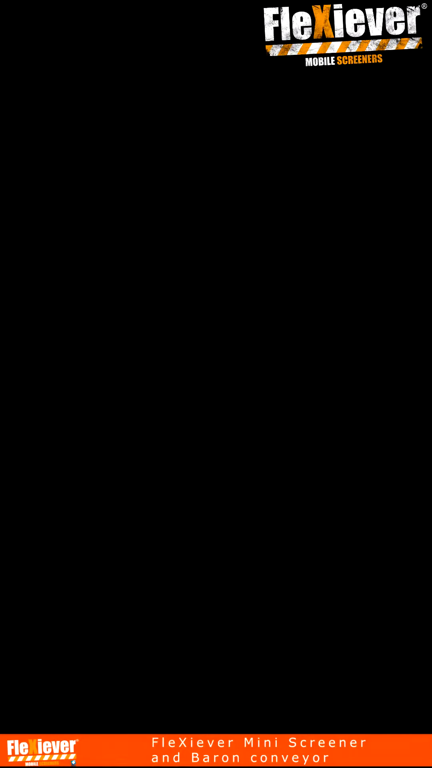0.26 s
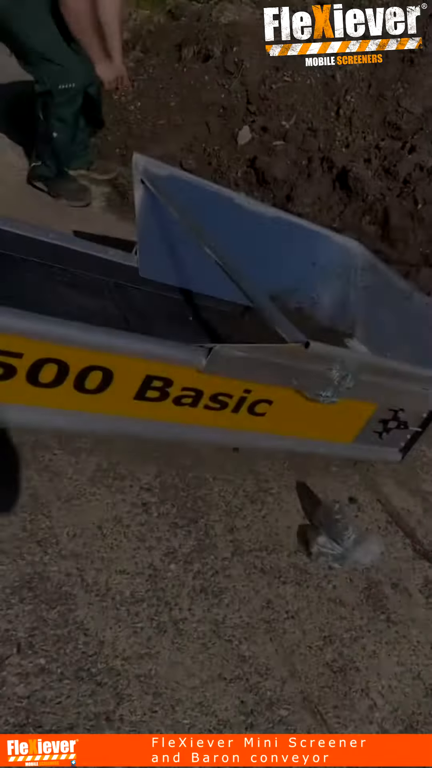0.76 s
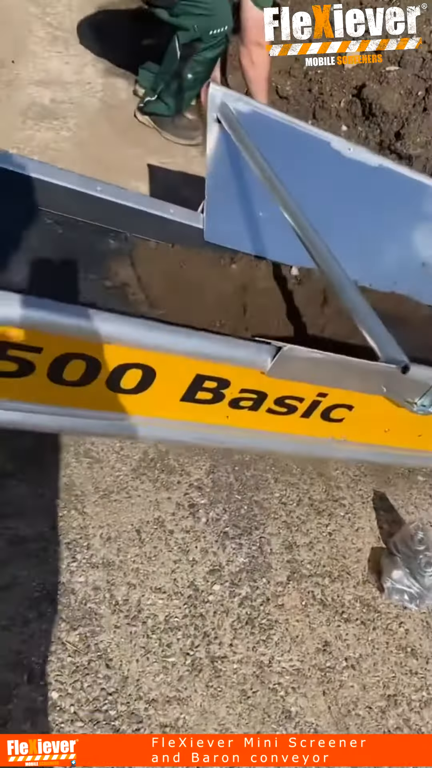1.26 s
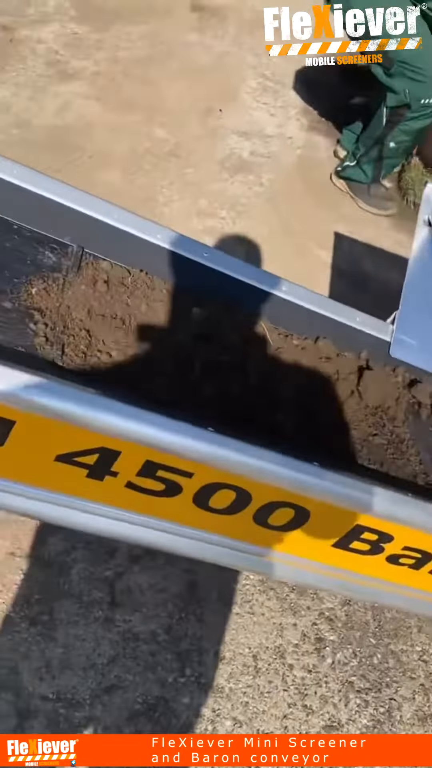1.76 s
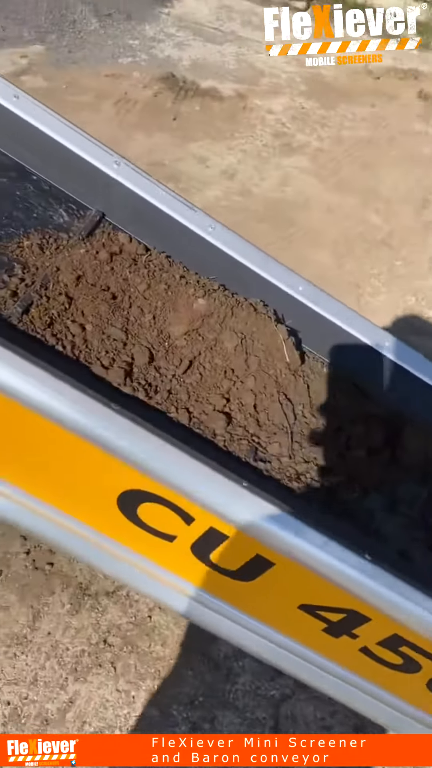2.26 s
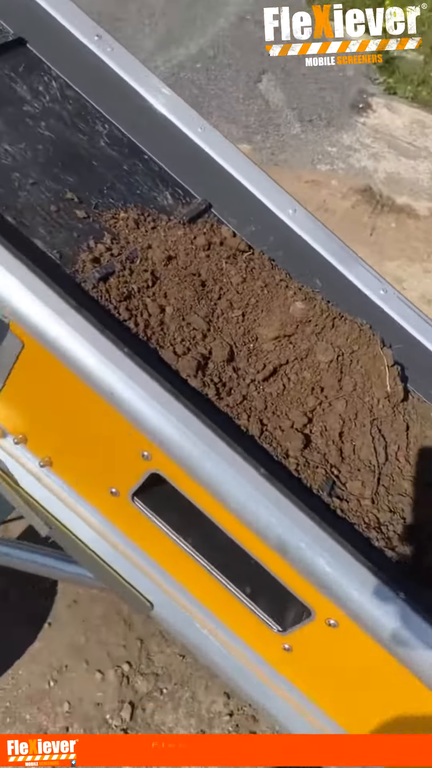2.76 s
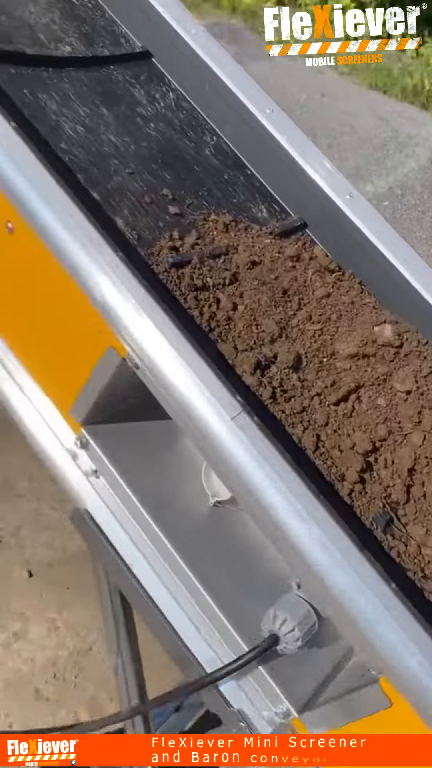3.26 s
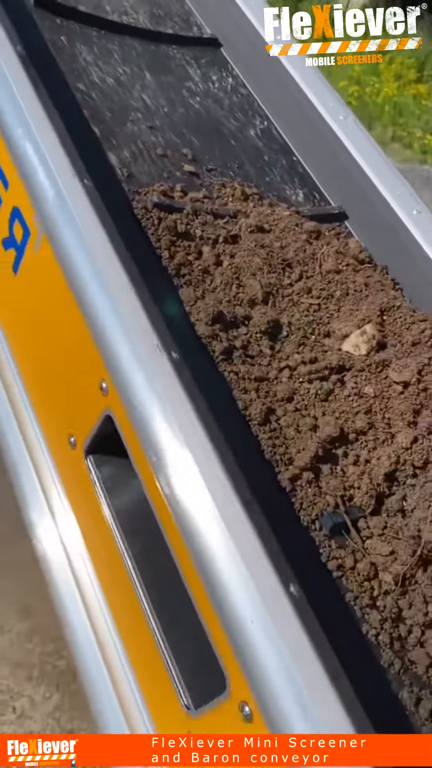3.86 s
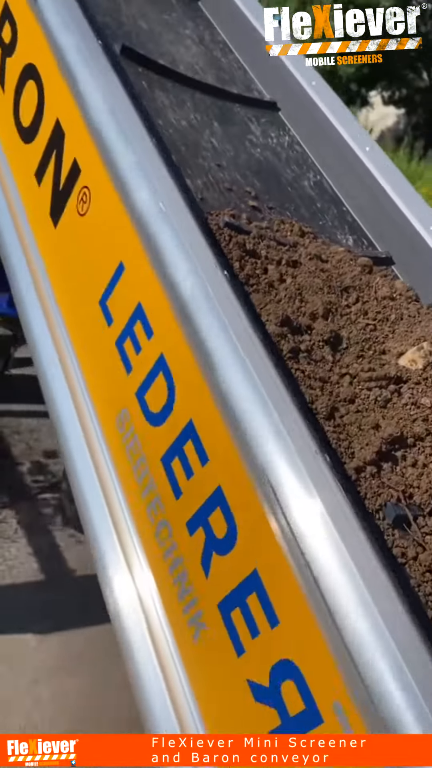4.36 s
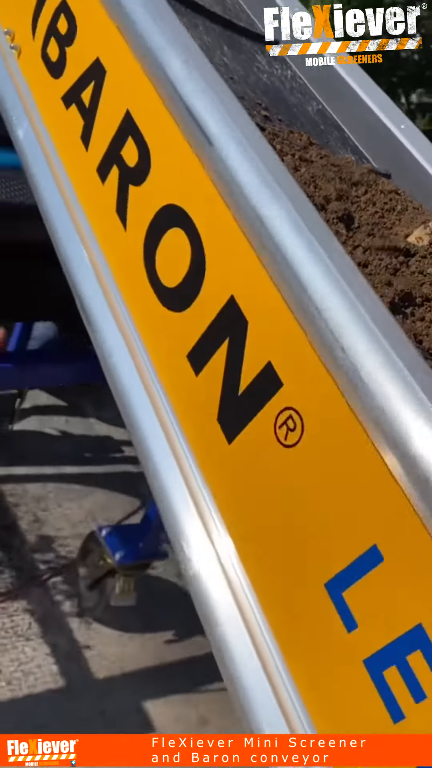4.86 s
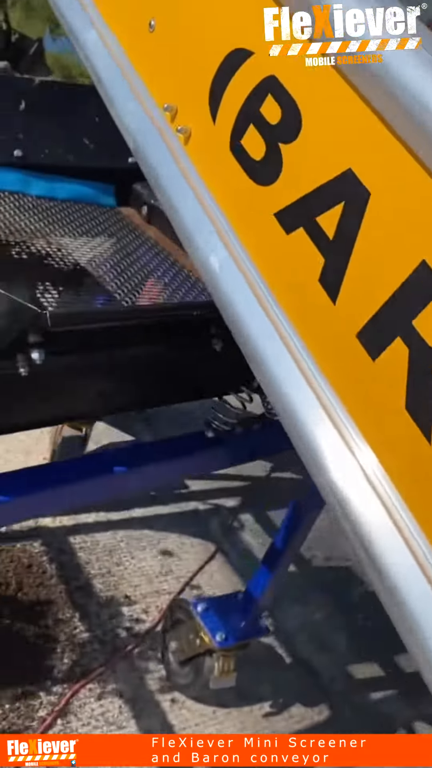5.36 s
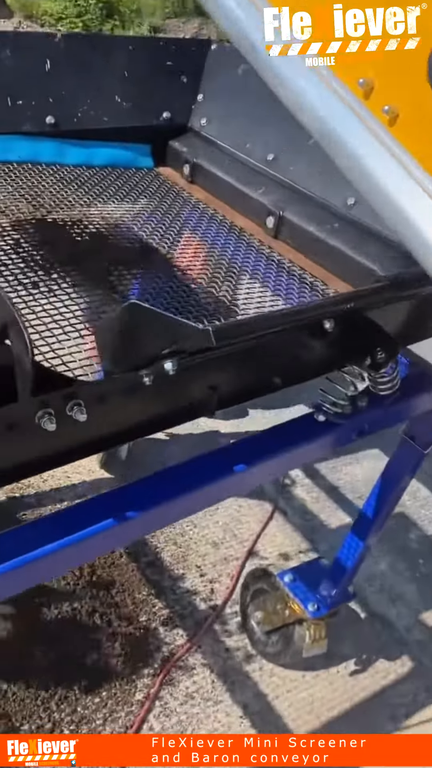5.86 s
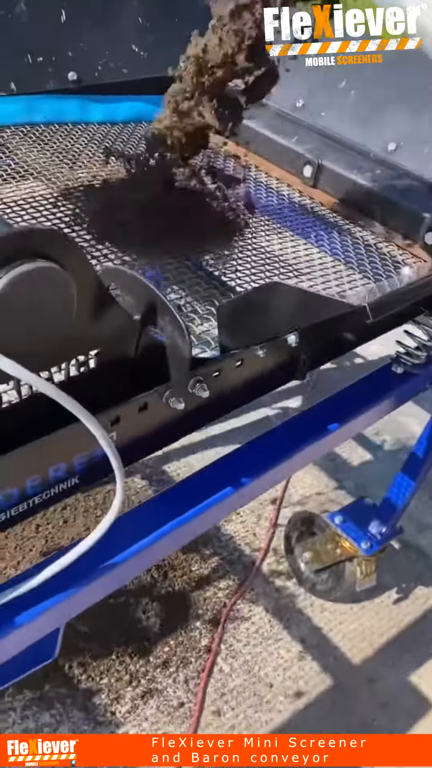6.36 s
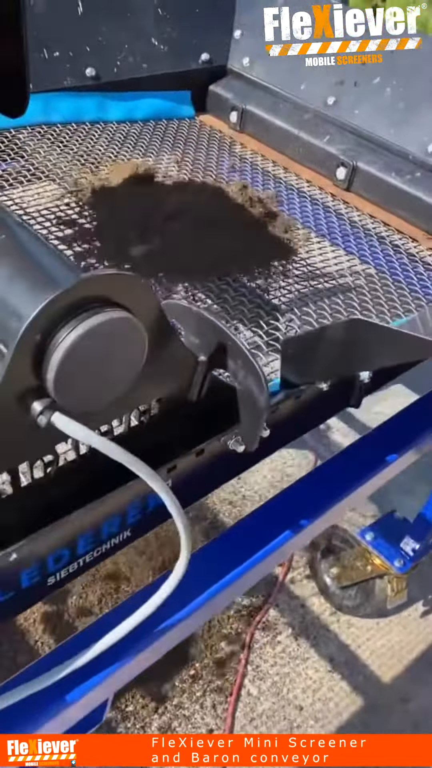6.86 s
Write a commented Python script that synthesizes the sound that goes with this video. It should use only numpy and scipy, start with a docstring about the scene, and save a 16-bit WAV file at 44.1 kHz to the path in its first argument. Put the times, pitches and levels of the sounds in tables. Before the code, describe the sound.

Steady machine rumble and fast metal mesh chatter outdoors, with dull soil thuds, shovel clangs and later lumps knocking on ringing plates.

```python
"""Outdoors at a vibrating soil screener, heard from a phone carried along the feed belt to the deck.
Belt and rollers rumble; belt, frame and legs ring with the shaking. The loose mesh chatters and slaps
once a shaft turn. Shovelled soil thuds into the hopper and the shovel clangs on its sheet; later,
clods knock on the deck and ring its side plates. The sound fades in."""
import sys
import numpy as np
from scipy import signal
from scipy.fft import rfft, irfft, next_fast_len
from scipy.io import wavfile
from scipy.ndimage import uniform_filter1d

SR = 44100
rng = np.random.default_rng(int(sys.argv[2]) if len(sys.argv) > 2 else 0)


def generate_wav(signal):
    """Clip the signal to [-1, 1] and save it as 16-bit WAV at the path in sys.argv[1]."""
    frames = np.transpose(np.atleast_2d(signal))
    scaled = np.clip(frames, -1, 1) * 32767
    pcm = np.round(scaled).astype(np.int16)
    wavfile.write(sys.argv[1], SR, pcm)


N = 313992
N_FFT = next_fast_len(N)
TIME_S = np.arange(N) / SR
BINS_HZ = np.arange(N_FFT // 2 + 1) * SR / N_FFT + 1
SHAFT_HZ = 24.265


def undb(db):
    return 10 ** (np.asarray(db) / 20)


def unit_rms(x):
    return x / np.sqrt(np.mean(x ** 2))


def over_time(table):
    return np.interp(TIME_S, *np.transpose(table))


def over_hz(table):
    """A (Hz, value) table at every bin, interpolated on a log axis."""
    hz, value = np.transpose(table)
    return np.interp(np.log(BINS_HZ), np.log(hz), value)


def to_samples(spectrum):
    return irfft(spectrum, N_FFT)[:, :N]


def band(x, lo_hz, hi_hz):
    return signal.sosfilt(signal.butter(3, [lo_hz, hi_hz], "band", fs=SR, output="sos"), x)


def mode(x, hz, t60_s):
    pole = np.exp(2j * np.pi * hz / SR - np.log(1000) / (t60_s * SR))
    return signal.lfilter([1], [1, -pole], x).imag


def resonance(x, hz, width_hz):
    return signal.lfilter(*signal.iirpeak(hz, hz / width_hz, fs=SR), x)


def drift(rate_hz):
    """Random steps, smoothed twice; spread near 1."""
    hold = int(SR / rate_hz)
    steps = np.repeat(rng.standard_normal(N // hold + 1), hold)
    return uniform_filter1d(uniform_filter1d(steps, hold), hold)[:N]


def burst(start_s, rise_s, t60_s, curve=1.467):
    """Slice and envelope of a blow: short rise, then a fall that steepens as the bouncing dies."""
    start = int(start_s * SR)
    t = np.arange(min(int(t60_s * SR), N - start)) / SR
    attack = np.sin(np.pi / 2 * np.minimum(t / rise_s, 1)) ** 2
    return slice(start, start + len(t)), attack * undb(-60 * (t / t60_s) ** curve)


def hum(modes):
    """Noise-driven rings with steep flanks."""
    out = np.zeros((2, N))
    for hz, width_hz, db in modes:
        ring = resonance(rng.standard_normal((2, N)), hz, width_hz)
        out += undb(db) * unit_rms(resonance(ring, hz, 2 * width_hz))
    return out


def rumble(upper_db):
    """Belt, rollers and frame: half-octave noise bands, each flickering on its own."""
    # rumble spectrum: (frequency [Hz], relative density [dB])
    density = [(15, -54), (25, -21), (55, -10), (80, -11.5), (113, -5.5), (176, -8.5), (232, -8.5),
               (287, -12), (468, -7.5), (716, -11.5), (1170, -13), (1670, -20), (1860, -21), (3040, -25),
               (4000, -31.5), (5200, -69), (8800, -120)]
    # bands below about 200 Hz: (time [s], level [dB])
    bass_level = [(.31, -38), (.85, -31.5), (1.2, -38), (2.4, -36.5), (3.0, -36), (4.7, -36.5), (5.3, -44),
                  (6.3, -35.5), (7.12, -41)]
    spectrum = rfft(rng.standard_normal((2, N_FFT))) * undb(over_hz(density))
    bass, upper = np.zeros((2, 2, N))
    for log2_hz in np.arange(4.5, 12.6, .5):
        window = np.clip(1 - abs(np.log2(BINS_HZ) - log2_hz) * 2, 0, 1)
        part = undb(3 * drift(14)) * to_samples(spectrum * window)
        if 2 ** log2_hz < 200:
            bass += part
        else:
            upper += part
    return unit_rms(upper) * undb(upper_db) + unit_rms(bass) * undb(over_time(bass_level))


def belt_and_frame(belt_db, frame_db):
    """Rings kept going by the shaking; the frame's wavers."""
    # belt modes: (frequency [Hz], width [Hz], level [dB])
    belt_modes = [(471.7, 16.6, -3.5), (453, 250, -3)]
    # frame modes: (frequency [Hz], width [Hz], level [dB])
    frame_modes = [(223, 33, 1), (392, 81, -5), (546, 63, -12)]
    return hum(belt_modes) * undb(belt_db) + hum(frame_modes) * undb(frame_db + 1.9 * drift(20))


def legs():
    """The legs ring in one narrow low mode."""
    # leg ring: (time [s], level [dB])
    level = [(.31, -46), (4.2, -46.5), (4.9, -38), (5.3, -40), (5.9, -38), (6.25, -33.5), (7.12, -37)]
    hz, width_hz = 160.5, 11
    return hum([(hz, width_hz, 0)]) * undb(over_time(level))


def shaft():
    """Low multiples of the shaft rate, drifting in level and phase."""
    # shaft tones: (multiple of the shaft rate, level [dB])
    tones = [(3, -50.5), (4, -44.5), (5, -42.5)]
    turns = SHAFT_HZ * TIME_S
    return sum(undb(db + 4.6 * drift(2.5)) * np.sin(2 * np.pi * (multiple * turns + 0.12 * drift(2.98)))
               for multiple, db in tones)


def wire_chatter():
    """Dense knocks, a few much harder, ring in the loose wires; returns low, mid and top bands."""
    # mesh spectrum: (frequency [Hz], relative density [dB])
    density = [(240, -4), (400, -15.5), (1000, -5.5), (1700, -4), (2700, -7.5), (3500, -6.5), (5600, -11),
               (6500, -14.5), (8000, -27.5), (10000, -28.5), (13000, -29), (13500, -81), (15700, -58)]
    # wire resonances: (frequency [Hz], width [Hz], relative level [dB])
    wires = [(780, 20, 0.5), (894, 35, 0), (1150, 35, -9), (1886, 154, -5.5), (2614, 21, -6),
             (4110, 150, -16), (4820, 75, -21), (5850, 150, -15), (8620, 940, -5)]
    knocks = rng.standard_normal((2, N)) * undb(1.93 * np.minimum(rng.exponential(size=N), 7.5))
    chatter = to_samples(rfft(knocks, N_FFT) * undb(over_hz(density)))
    chatter += sum(undb(db + 5.5) * resonance(chatter, hz, width_hz) for hz, width_hz, db in wires)
    bands_hz = (300, 1460), (2300, 5410), (6300, 12500)
    return [unit_rms(band(chatter, *edges)) for edges in bands_hz]


def wire_patch(x, spread_db, width_hz=45):
    """Random spectral peaks and dips: every blow shakes another patch of wires."""
    size = 8192
    bins, width = size // 2 + 1, int(width_hz * size / SR) + 1
    peaks = uniform_filter1d(np.repeat(rng.standard_normal(bins), width)[:bins], width)
    return unit_rms(irfft(rfft(x, size) * undb(spread_db * peaks), size)[:, :x.shape[1]])


def mesh_rattle(low, mid, top):
    """The loose mesh chatters all the time and slaps once a shaft turn."""
    # top band against mid band: (time [s], level [dB])
    top_level = [(.31, -7), (.9, -4), (1.2, -7), (2.0, -5.5), (2.6, -7.5), (3.4, -3.5), (4.1, -2.5),
                 (4.7, -7.5), (5.5, -6.5), (6.2, -6.5), (7.12, -6.5)]
    chatter = (undb(-1.5 + 0.5 * drift(19)) * low
               + undb(0.49 * drift(14)) * mid
               + undb(over_time(top_level) + 3.4 * drift(22)) * top)
    out = undb(-10) * chatter
    for turn_s in np.arange(0.017, N / SR - .01, 1 / SHAFT_HZ):
        late_s = 0.0038 * abs(rng.standard_normal())
        at, envelope = burst(turn_s + late_s, rise_s=0.0088, t60_s=0.17)
        slap_db = 2.5 + 3 * rng.standard_normal()
        out[:, at] += undb(slap_db) * envelope * wire_patch(chatter[:, at], spread_db=5.7)
    return out


def hard_slaps(low, mid, top):
    """Hard slaps of the mesh, each with one strongest wire; a stone ticks on a wire near the peak."""
    # slaps: (time [s], level [dB], low band [dB], top band [dB], wire [Hz], t60 before limiting [s])
    slaps = [(.524, -35.5, 9, 6, 4080, 0.077), (.792, -15.5, -2.5, -30, 2900, 0.021),
             (.975, -43, -11, -19, 4470, 0.034), (1.015, -48, -11, -24, 4600, 0.061),
             (1.06, -32.5, -1, -36, 2460, 0.078), (1.138, -36, 1, -5, 2960, 0.12),
             (1.172, -35.5, 5, -9, 4090, 0.13), (1.262, -26.5, -7, -11, 4320, .075),
             (1.346, -33, 0, -4, 3900, 0.095), (1.387, -38, -5, -17, 4300, 0.048),
             (1.51, -41, 3, -18, 3000, 0.11), (1.55, -39, -1, -20, 3300, 0.047),
             (1.634, -29, 4, -34, 3600, 0.081), (1.714, -40.5, -7, -7, 3430, 0.18),
             (1.963, -36, -5, -21, 3400, 0.21), (2.037, -37.5, 17.5, -5, 2680, 0.15),
             (2.119, -36, -6, 0, 2790, 0.074), (2.21, -41, 21.5, -29, 2580, 0.14),
             (2.332, -28, 11, -35, 2700, 0.16), (2.458, -26, -5, -40, 2600, 0.087),
             (2.495, -25, 5.5, -12, 2370, 0.13), (2.615, -41, 9, -1, 3560, 0.062),
             (2.959, -31, -8, 8.5, 2750, 0.11), (3.057, -41.5, 2, 9, 5640, 0.12),
             (3.42, -30.5, 9, 8, 3870, 0.064), (3.459, -31, -10, -5, 5500, 0.073),
             (3.502, -25, -18, -6, 2670, 0.035), (3.584, -28, 4, 2, 5260, 0.079),
             (3.704, -30.5, 12, -14, 2460, 0.021), (3.777, -34, -18, -15, 2850, 0.045),
             (3.863, -33, 6, -2, 3550, 0.25), (3.992, -27.5, -2, 3.5, 3200, 0.12),
             (4.094, -25.5, -7, 1.5, 5600, 0.046), (4.18, -31.5, -2, -21, 2470, 0.071),
             (4.268, -35, -9, -12, 2840, 0.04), (4.398, -26.5, 1, -18, 2460, 0.19),
             (4.555, -25.5, -31, 1, 2330, 0.067), (4.638, -18, -12, -5, 4950, 0.1),
             (4.67, -24.5, 6.5, -7, 4140, 0.085), (4.76, -17.5, -7, -30, 4020, 0.064),
             (4.834, -29, -12, 4, 5600, 0.033), (4.889, -27, 3, -18, 2220, 0.12),
             (4.92, -40, -5, 11, 4500, 0.044), (4.962, -29, -7, -2, 2300, 0.087),
             (5.002, -16.5, -1.5, -2, 2050, 0.078), (5.09, -26.5, -7, -19, 3000, 0.035),
             (5.13, -26.5, -13, -10, 4280, 0.035), (5.173, -31.5, 14, -18, 4400, 0.021),
             (5.209, -23.5, 0, -7, 4000, 0.035), (5.258, -26, -6, -28, 2730, 0.053),
             (5.292, -29, -1, 3.5, 2640, 0.056), (5.331, -21.5, 2, -12, 2670, 0.065),
             (5.421, -24, -8, -16, 2620, 0.085), (5.463, -19, -5, 4, 5200, 0.15),
             (5.504, -17.5, -7, -3, 5040, 0.081), (5.549, -23, -15, 5.5, 5300, 0.073),
             (5.619, -22.5, -23, -0.5, 5000, 0.11), (5.665, -19.5, -6, -1.5, 5000, 0.031),
             (5.7, -37, 4, 1, 2700, 0.21), (5.796, -30, 7, -11, 2350, 0.12),
             (5.832, -32, -5, -19, 3810, 0.032), (5.908, -28, -10, -36, 2730, 0.074),
             (6.067, -19, -1, -33, 2600, 0.043), (6.147, -20, 4.5, -12, 2510, 0.12),
             (6.238, -30, 6, -38, 2600, 0.16), (6.278, -20.5, -1, -40, 2720, 0.052),
             (6.321, -26.5, 1, -8, 2510, 0.11), (6.396, -22, 1.5, -5, 2470, 0.058),
             (6.532, -26.5, -23, 6, 2270, 0.11), (6.6, -43, 8, 16.5, 3150, 0.17),
             (6.643, -25.5, 3, -7, 4130, 0.055), (6.687, -22, -3, -24, 2610, 0.071),
             (6.726, -19.5, 0, 0, 4900, 0.05), (6.768, -16, -5, 2.5, 3800, 0.068),
             (6.85, -21.5, 4, -6, 4440, 0.035), (6.894, -22.5, -29, 4, 2800, 0.073),
             (6.968, -27.5, -10, -1, 2600, 0.12), (7.02, -25, -1, -20, 2630, 0.14),
             (7.06, -26.5, -2, -30, 2680, 0.13)]
    out = np.zeros((2, N))
    _, tick_envelope = burst(0, rise_s=0.00023, t60_s=0.013)
    tick_samples, lag_samples = len(tick_envelope), 200
    for start_s, db, low_db, top_db, wire_hz, t60_s in slaps:
        rise_s = np.clip(0.097 * t60_s, .0025, .011)
        at, envelope = burst(start_s, rise_s, np.clip(t60_s, .02, .185), curve=1.25)
        blow = undb(low_db) * low[:, at] + mid[:, at] + undb(top_db) * top[:, at]
        patch = np.std(blow) * wire_patch(blow, spread_db=5.5)
        wire = undb(7.5) * resonance(mid[:, at], wire_hz, width_hz=410)
        out[:, at] += undb(db) * envelope * (patch + wire)
        tick = tick_envelope * mid[:, at.start:][:, :tick_samples] * rng.random() ** 2
        out[:, at.start + lag_samples:][:, :tick_samples] += undb(db - 4) * tick
    return out


def soil_impacts(lumps, rise_s, t60_s, swing_db, crumbs_db):
    """Each lump lands as a dull swing at its own pitch, with a hiss of crumbs."""
    out = np.zeros((2, N))
    for start_s, db, hz in lumps:
        at, envelope = burst(start_s, rise_s, t60_s)
        n = len(envelope)
        swing = np.sin(2 * np.pi * (hz * TIME_S[:n] + rng.random(size=(2, 1))))
        noise = rng.standard_normal((2, n + 1500))
        crumbs = unit_rms(band(noise, hz / 1.78, hz * 2.48))[:, -n:]
        out[:, at] += undb(db) * envelope * (undb(swing_db) * swing + undb(crumbs_db) * crumbs)
    return out


def soil_thuds():
    """Shovelled soil lands on the belt in the hopper."""
    # lumps: (time [s], level [dB], pitch [Hz])
    lumps = [(.692, -22, 302), (.7, -6, 141), (.705, -22, 416), (.729, -8.5, 146), (.732, -22, 514),
             (.755, -11.5, 160), (.76, -14, 62), (.8, -16, 124), (.87, -19, 97), (.899, -30, 181),
             (1.228, -21, 165), (1.263, -17.5, 185), (1.619, -15, 176), (1.642, -16, 169),
             (1.987, -17.5, 175), (2.015, -17, 273), (2.35, -18, 352), (2.386, -15.5, 186),
             (2.762, -14, 187), (2.935, -22, 410), (2.955, -6, 178), (2.962, -15, 390), (2.966, -8.5, 513),
             (2.975, -4, 220), (2.989, -5, 159), (2.985, -17, 294), (2.995, -20, 480), (3.02, -19, 430),
             (3.01, -5, 161), (3.034, -10.5, 149), (3.066, -10, 106), (3.08, -22, 55), (3.1, -19, 265),
             (3.13, -21, 172), (3.847, -24, 334), (4.852, -13, 218), (4.885, -18.5, 131),
             (4.914, -13.5, 253), (4.934, -14, 180), (4.964, -15, 184), (4.988, -25, 145),
             (5.009, -16.5, 152), (4.95, -23, 90), (5.47, -21, 75), (6.6, -27, 60), (6.85, -19, 72)]
    return soil_impacts(lumps, rise_s=0.0047, t60_s=.08, swing_db=-3.5, crumbs_db=-6.5)


def blade_ring():
    """The shovel blade rings briefly at its first strike."""
    # blade modes: (frequency [Hz], level [dB])
    modes = [(1703, -28.5), (2548, -32)]
    out = np.zeros((2, N))
    at, envelope = burst(.692, rise_s=0.0035, t60_s=0.25)
    t = TIME_S[:len(envelope)]
    out[0, at] = envelope * sum(undb(db) * np.sin(2 * np.pi * hz * t) for hz, db in modes)
    return out


def shovel_clangs():
    """Blows scrape over the hopper sheet and ring it, most near the pitch of the spot struck."""
    # blows: (time [s], ring [dB], scrape [dB], spot pitch [Hz])
    blows = [(.693, -60, -18, 550), (2.018, -61.5, -16, 460), (2.043, -47, -17, 610),
             (2.075, -53.5, -18, 800), (2.122, -60, -24, 470), (2.214, -53.5, -16, 950),
             (2.352, -53.5, -26, 390), (2.45, -57.5, -24, 440), (2.501, -58, -7.5, 1100),
             (2.529, -57.5, -11, 900), (2.63, -58, -25, 504), (2.963, -52, -11, 500)]
    # hopper sheet modes: (frequency [Hz], level [dB], t60 [s])
    modes = [(378, -7, 1.63), (387, -14, 0.45), (469.6, -4.5, 0.56), (332, -22, 0.06), (526, 10, 0.011),
             (634, -7, .6), (784, -11, 0.17), (885, -4.5, 0.16), (972, -7, 0.22), (1020, -7, 0.18),
             (1147, -4, 0.36), (1252, -1, .15), (1360, -13, 0.17)]
    falloff_db_per_octave, ring_samples = 5.5, 32000
    sheet, scrape = np.zeros((2, 2, N))
    for start_s, ring_db, scrape_db, spot_hz in blows:
        at, envelope = burst(start_s, rise_s=0.001, t60_s=0.13)
        knocks = envelope * rng.standard_normal((2, 9000))[:, :len(envelope)]
        force = np.zeros(ring_samples)
        force[:len(envelope)] = knocks[0]
        force[90] += undb(31)  # first hard contact
        for hz, db, t60_s in modes:
            mode_db = ring_db + db - falloff_db_per_octave * abs(np.log2(hz / spot_hz))
            sheet[0, at.start:][:ring_samples] += undb(mode_db) * mode(force, hz, t60_s)
        scrape[:, at] += undb(scrape_db) * knocks
    sheet *= undb(4 * drift(18))  # loose soil makes the ring waver
    return sheet + band(scrape, 900, 980) + undb(-5) * band(scrape, 1200, 3760)


def deck_clods():
    """Clods knock on the deck and ring the plate modes nearest their pitch, detuned and uneven."""
    # clods: (time [s], level [dB], pitch [Hz])
    clods = [(4.404, -15, 464), (4.519, -17, 460), (4.647, -11, 480), (4.892, -15, 914), (4.895, -17, 1780),
             (4.974, -12, 506), (5.143, -15, 660), (5.302, -11, 413), (5.377, -12.5, 546),
             (5.462, -10.5, 553), (5.502, -16, 740), (5.506, -9, 1522), (5.558, -10.5, 540),
             (5.628, -10, 754), (5.63, -16, 957), (5.632, -19, 1770), (5.668, -13, 1500),
             (5.695, -12.5, 557), (5.703, -10.5, 1770), (5.714, -12, 1320), (5.718, -8.5, 768),
             (5.735, -16, 1150), (5.745, -13, 1020), (5.762, -14, 1080), (5.8, -9, 930), (5.803, -8, 497),
             (5.805, -13, 1170), (5.77, -11, 514), (5.835, -12, 1177), (5.839, -10.5, 518),
             (5.95, -20, 965), (6.038, -15, 537), (6.068, -16, 1285), (6.11, -11.5, 524),
             (6.154, -13, 2420), (6.157, -8, 1756), (6.202, -17, 1180), (6.41, -18, 1150),
             (6.554, -10.5, 663), (6.603, -8, 434), (6.612, -10.5, 1120), (6.632, -7, 416),
             (6.64, -10.5, 737), (6.69, -14, 1560), (6.726, -14, 1100), (6.775, -8, 806), (6.852, -15, 450),
             (7.065, -26, 950)]
    # side plate modes: (frequency [Hz], level [dB], t60 [s])
    modes = [(424, -7, 0.11), (537.7, 0, 0.19), (658.4, -7.5, 0.16), (762, -6.5, 0.27), (895, -5.5, 0.15),
             (972, -1, 0.13), (1170, 1, 0.25), (1276, -1, 0.19), (1524, -1, 0.18), (1734, 0, 0.099),
             (2380, -4, .12), (2480, -8, .12)]
    falloff_db_per_octave, ring_samples = 34, 9000
    knocks = soil_impacts(clods, rise_s=0.0033, t60_s=0.062, swing_db=-8, crumbs_db=-22)
    plates, t = np.zeros((2, N + ring_samples)), TIME_S[:ring_samples]
    attack = np.minimum(t / 0.0028, 1)
    hz, db, t60_s = np.transpose(modes)[:, :, None]
    for start_s, clod_db, clod_hz in clods:
        detune, size, phase = rng.standard_normal((3, len(hz), 1))
        mode_db = db + clod_db - falloff_db_per_octave * abs(np.log2(hz / clod_hz)) + 1.56 * size
        tones = np.sin(2 * np.pi * hz * (1 + 0.0041 * detune) * t + 3 * phase)
        rings = undb(mode_db - 60 * t / t60_s) * tones
        plates[0, int(start_s * SR):][:ring_samples] += attack * rings.sum(axis=0)
    return knocks + undb(-11.5) * plates[:, :N]


def phone_ports(sources):
    """Shared (row 0) and scattered sound (row 1) to left and right; turning tilts the balance."""
    # likeness of the ports: (frequency [Hz], coherence [0-1])
    likeness = [(40, 1), (80, 1), (150, 1), (290, 1), (690, 0.88), (1200, .9), (1700, 0.97), (2300, 0.88),
                (3300, 0.14), (4800, 0.55), (5400, 0.58), (7000, 0.9), (8700, 0.67), (10300, 1),
                (11900, 0.6), (13000, 0.77), (14000, .99)]
    # lead of the left port: (frequency [Hz], phase [rad])
    lead = [(20, 0), (1700, .1), (2800, 1.4), (3300, 1.6), (3800, .8), (4800, 1), (5300, .4), (6400, 2.7),
            (6900, 3.1), (7900, 3.15), (10000, 6.28), (11300, 6.3), (12500, 9.4), (13200, 9.4),
            (13600, 12.56)]
    # shape of the tilt: (frequency [Hz], left minus right before scaling [dB])
    tilt = [(60, .1), (125, .3), (250, 1.8), (600, 3.4), (1200, 2.2), (1700, 0), (2300, -.5), (3500, .7),
            (5500, .6), (6400, 0), (15000, -.2)]
    # turn of the left port to the machine: (time [s], share [0-1])
    turning = [(.31, 1), (.9, 0.7), (1.1, 1), (1.9, 0.6), (2.17, 1), (2.85, 0.84), (2.96, 0.4), (3.15, 0.4),
               (4.96, 0.48), (6.36, 0.3), (7.12, .35)]
    shared, scattered = rfft(sources, N_FFT)
    coherence, side = over_hz(likeness), np.array([[1], [-1]])
    spectra = np.sqrt((1 + coherence) / 2) * shared + side * np.sqrt((1 - coherence) / 2) * scattered
    spectra *= np.exp(.5j * side * over_hz(lead))
    tilt_db = 1.6 * over_hz(tilt)
    turned = to_samples(spectra * undb(side * tilt_db / 2))
    turn = over_time(turning)
    return (1 - turn) * to_samples(spectra) + turn * turned


def scene():
    """Machine, shovel, mesh and soil at the phone."""
    # walk from hopper to deck: (time [s], rumble [dB], rattle [dB], belt ring [dB], frame ring [dB])
    levels = [(.31, -31.5, -37.5, -36, -47), (.8, -29, -37, -31, -34), (1.1, -31, -41, -48, -60),
              (1.4, -29.5, -37, -32.5, -50), (1.8, -31, -39.5, -31, -61), (2.2, -28.5, -39, -37, -54),
              (2.6, -28, -36, -37, -48), (3.0, -27.5, -35, -32.5, -44), (3.6, -28.5, -34, -27, -48),
              (4.2, -27, -35, -27, -32), (4.8, -27.5, -30.5, -25, -32), (5.05, -26.5, -31.5, -36, -33),
              (5.5, -23, -31, -49, -27), (5.85, -26, -26.5, -46, -27), (6.2, -25.5, -32.5, -28.5, -30.5),
              (6.5, -24, -30, -38, -27.5), (7.12, -25, -29, -34, -30)]
    times_s, *columns = np.transpose(levels)
    rumble_db, rattle_db, belt_db, frame_db = (np.interp(TIME_S, times_s, db) for db in columns)
    soil = soil_thuds() + deck_clods()
    machine = legs() + rumble(rumble_db) + belt_and_frame(belt_db, frame_db) + shaft()
    shovel = blade_ring() + shovel_clangs()
    chatter = wire_chatter()
    mesh = mesh_rattle(*chatter) * undb(rattle_db) + hard_slaps(*chatter)
    return phone_ports(machine + shovel + mesh + soil)


def record(dry):
    """Fade-in from silence; the microphone drops the deepest bass, rounds peaks and cuts the top."""
    silent_s, fade_s, low_hz, top_hz = .305, 0.59, 45, 15700
    fade = np.clip((TIME_S - silent_s) / fade_s, 0, 1)
    highpassed = signal.sosfilt(signal.butter(2, low_hz, "high", fs=SR, output="sos"), dry)
    rounded = 1.189 * np.tanh(highpassed / 1.407)
    return signal.sosfilt(signal.ellip(8, .2, 70, top_hz, fs=SR, output="sos"), rounded * fade)


dry = scene()
out = record(dry)
generate_wav(out)
```